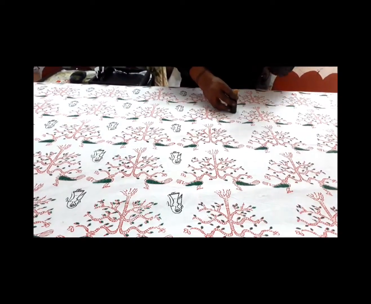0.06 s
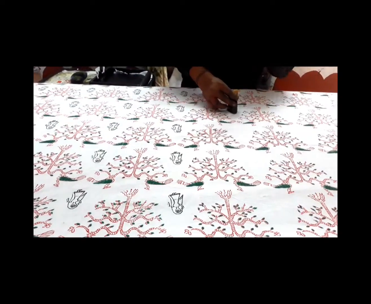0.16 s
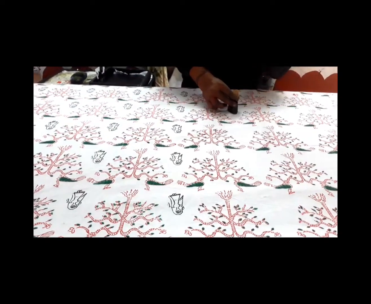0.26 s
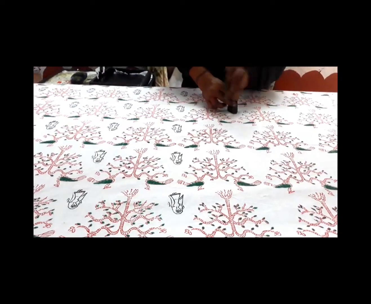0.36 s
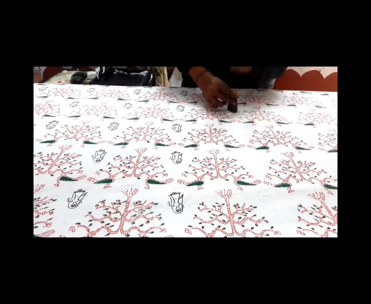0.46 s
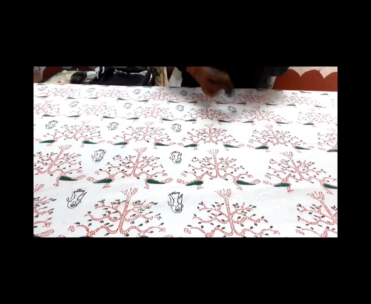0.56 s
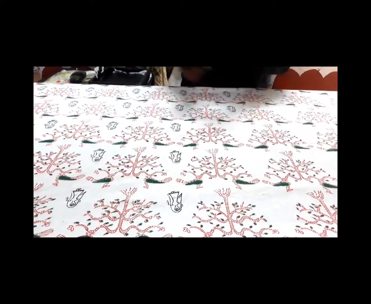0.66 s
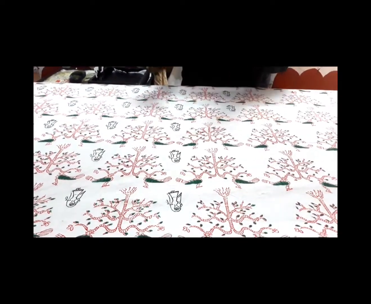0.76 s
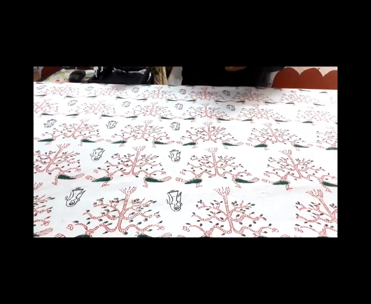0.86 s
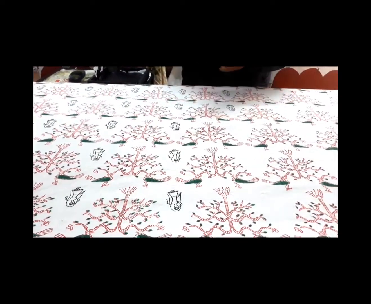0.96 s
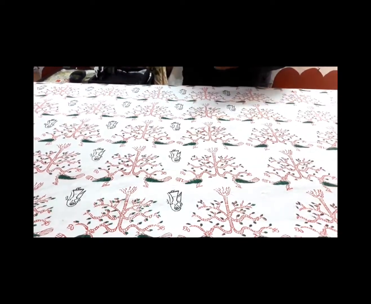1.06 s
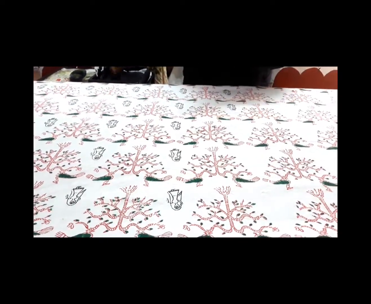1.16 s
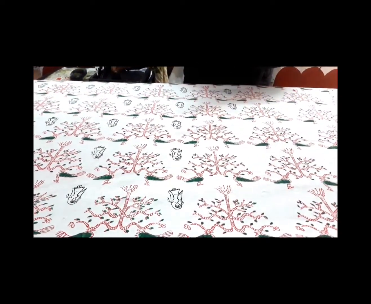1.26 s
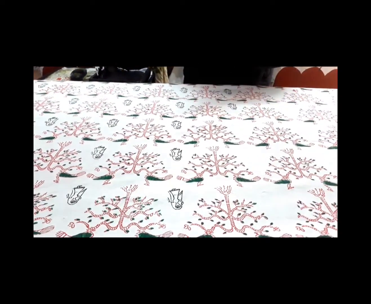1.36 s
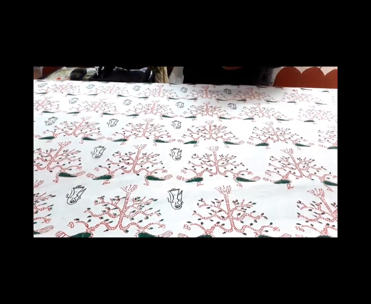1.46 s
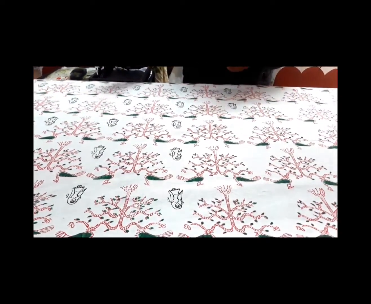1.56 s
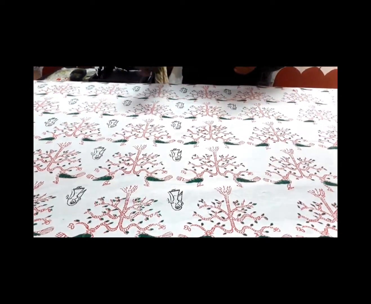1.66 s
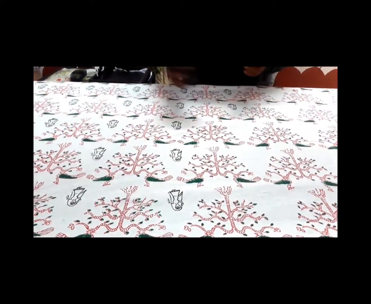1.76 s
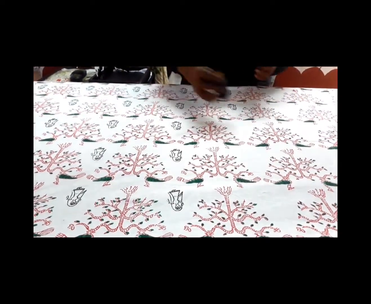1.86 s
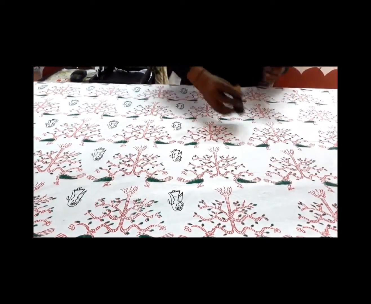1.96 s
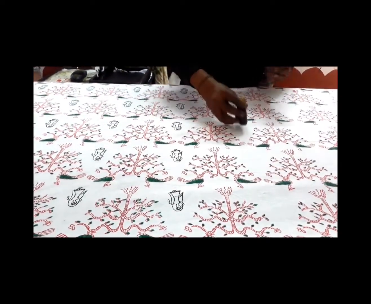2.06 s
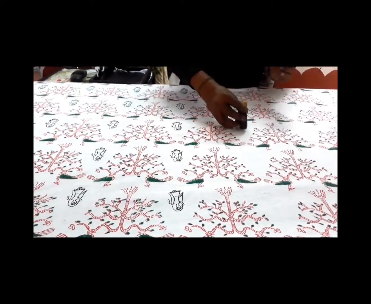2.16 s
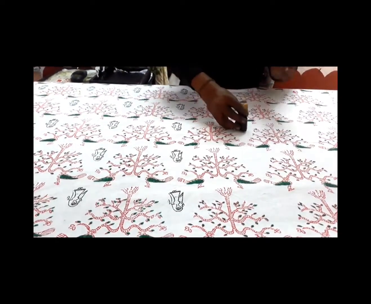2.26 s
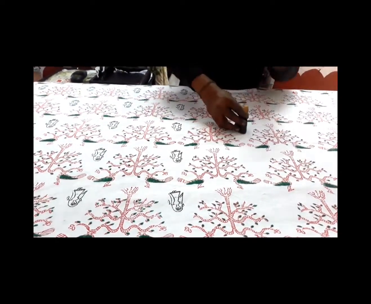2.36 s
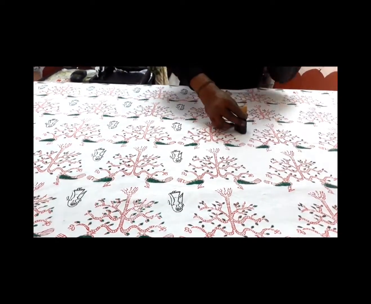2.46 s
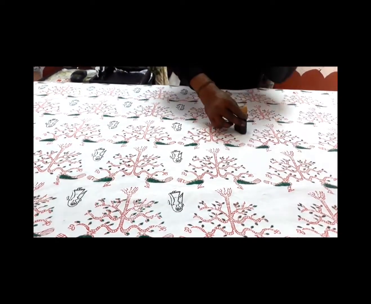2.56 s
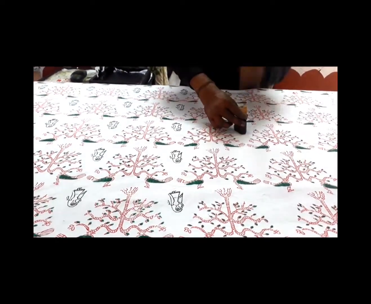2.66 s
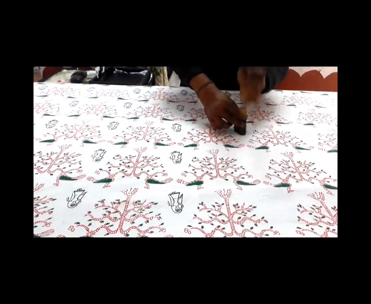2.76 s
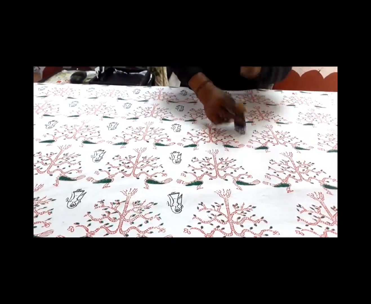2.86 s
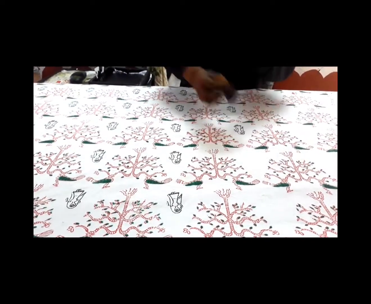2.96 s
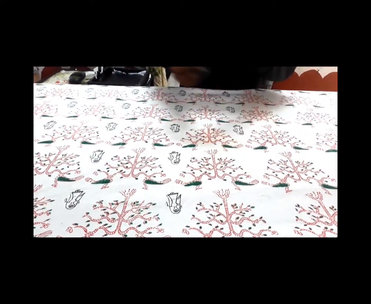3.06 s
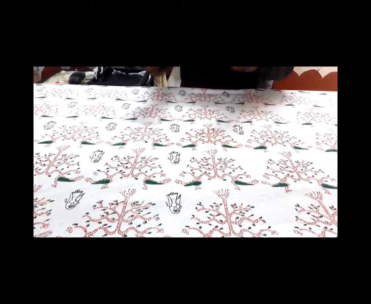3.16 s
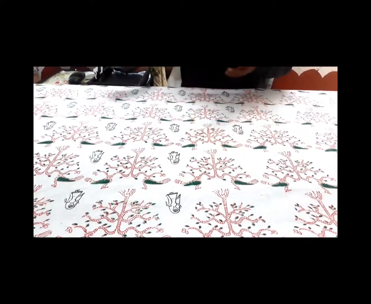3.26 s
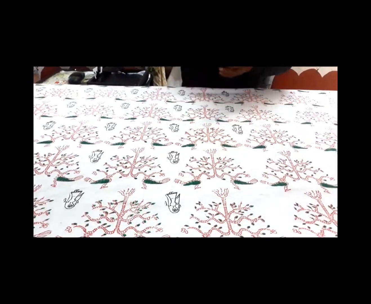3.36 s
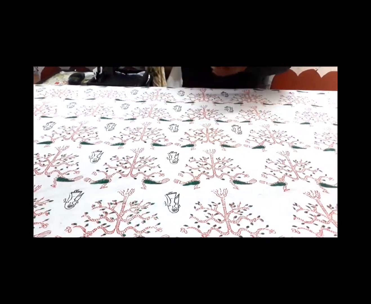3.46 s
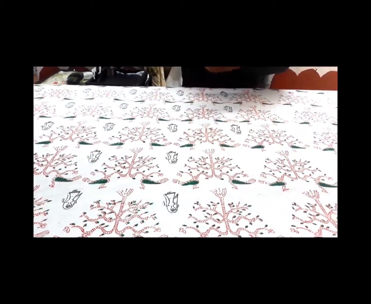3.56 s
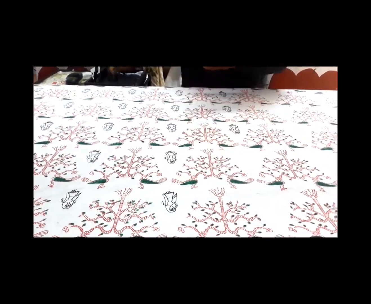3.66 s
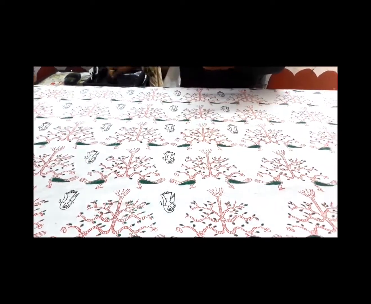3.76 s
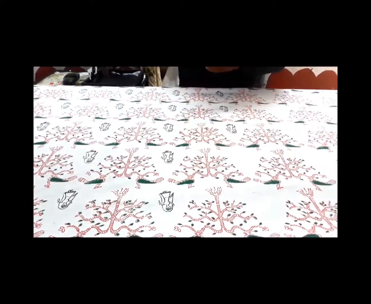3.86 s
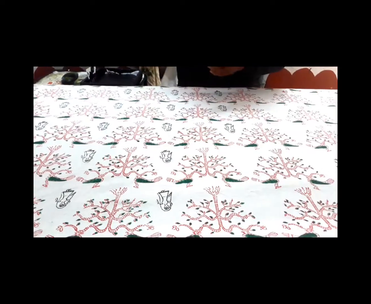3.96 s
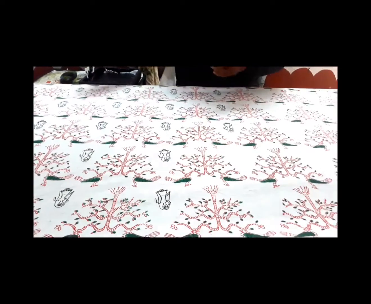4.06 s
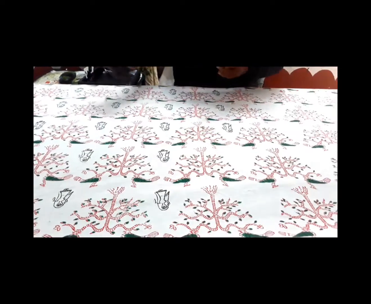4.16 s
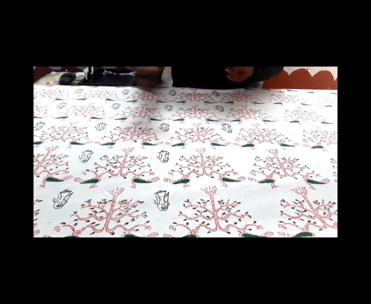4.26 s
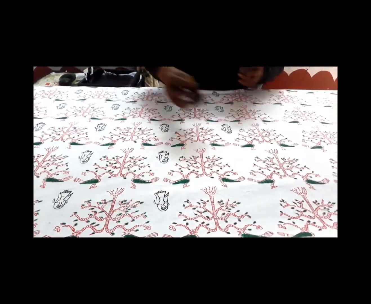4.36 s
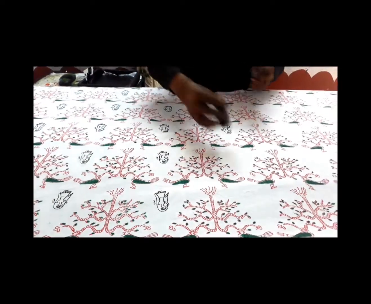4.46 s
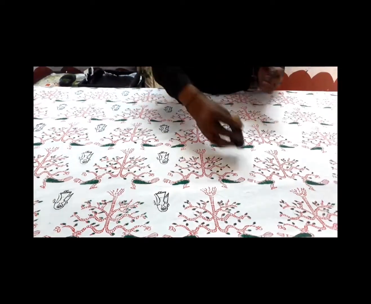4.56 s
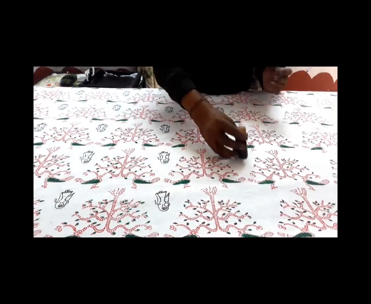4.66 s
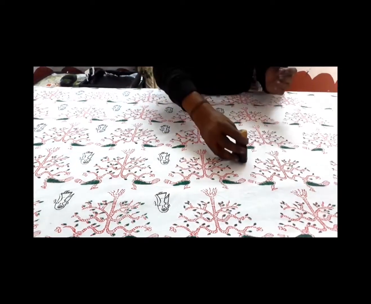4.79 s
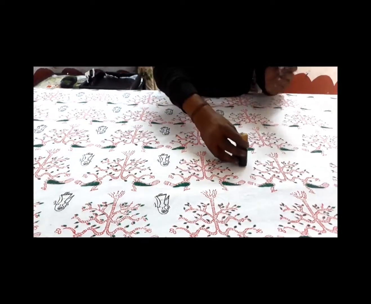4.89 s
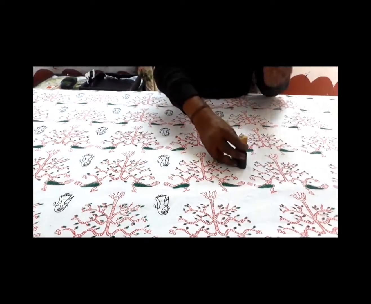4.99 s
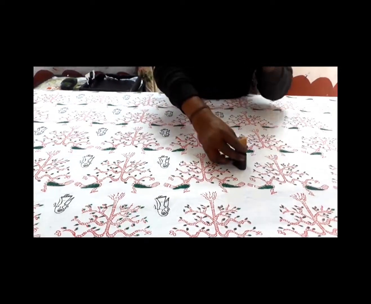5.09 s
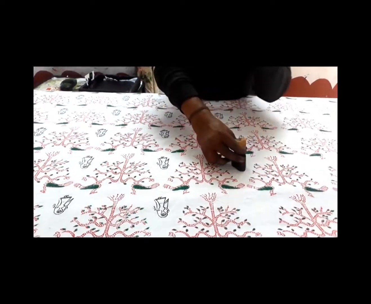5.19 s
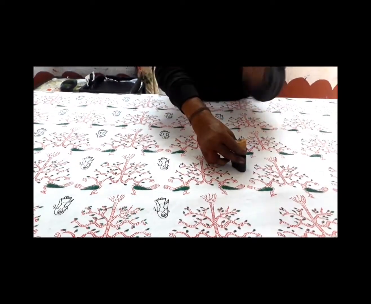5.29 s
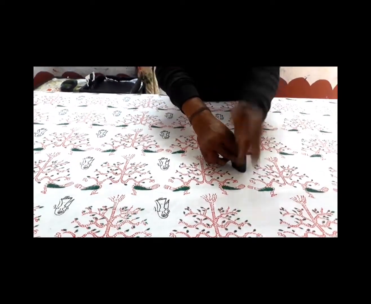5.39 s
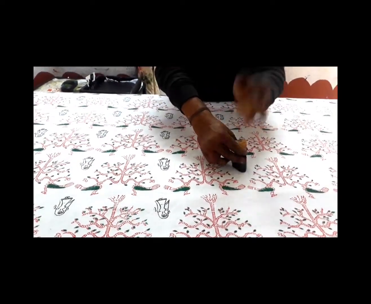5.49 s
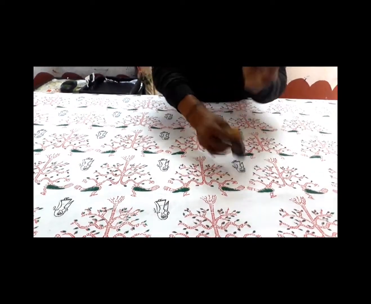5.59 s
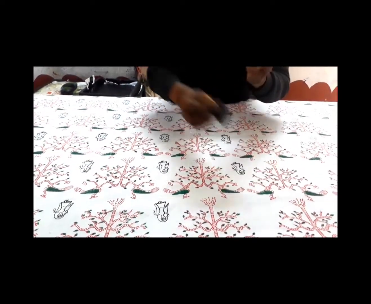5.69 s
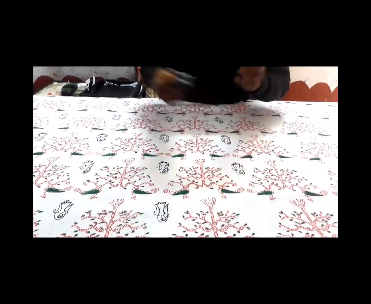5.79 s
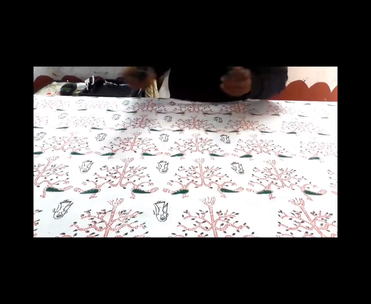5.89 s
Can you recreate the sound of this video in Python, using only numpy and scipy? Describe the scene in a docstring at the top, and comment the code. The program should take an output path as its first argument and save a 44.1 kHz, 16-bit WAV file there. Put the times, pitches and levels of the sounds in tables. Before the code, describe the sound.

Three deep fist thumps on a padded table, with dry wooden block knocks, soft tray rumbles and sleeve swishes between them in a quiet room.

```python
"""Hand block printing

A wooden block is set on cloth with dry knocks (short filtered pulses) in a quiet workshop, then struck
with the fist, so that the padded table booms (ringing modes and low noise). Between prints it is dabbed on
the dye tray, which rumbles. Sleeves swish and cloth shuffles as shaped noise, small things click,
the sliding block hums faintly, and a faint double tick sounds close to the microphone."""
import sys
import numpy as np
from scipy import signal
from scipy.fft import rfft, irfft, next_fast_len
from scipy.io import wavfile
from scipy.ndimage import uniform_filter1d

SR = 44100
rng = np.random.default_rng(int(sys.argv[2]) if len(sys.argv) > 2 else 0)


def materialize(psi):
    """Save the field psi as 16-bit PCM at rate SR to the path in sys.argv[1].

    A 1-D psi becomes a single channel; in a 2-D psi each row is a channel.
    """
    bounded = np.clip(np.atleast_2d(psi).T, -1, 1)
    quanta = np.round(bounded * 32767).astype(np.int16)
    wavfile.write(sys.argv[1], SR, quanta)


N = 261449
TIME = np.arange(N) / SR

# fist on the block: (time [s], level of contacts and boom [dB], contact cut-off [Hz], crack level [dB],
# slap level against the crack [dB], far-end echo level against the contacts [dB])
FIST_BLOWS = [(0.4229, 5.5, 295, -47.5, -36, 15), (2.7718, 5.5, 336, -49, -14, 14.5),
              (5.445, 6.5, 339, -46, -2, 7.5)]
# block dipped in the dye tray: (time [s], level [dB], rubbing length [s])
TRAY_DIPS = [(1.735, -12, 0.08), (4.116, -2, 0.207)]


def from_db(db):
    """Decibels to gain."""
    return 10 ** (np.asarray(db) / 20)


def at_hz(points, hz):
    """Read a spectrum on a log-frequency axis."""
    f, value = np.transpose(points)
    return np.interp(np.log(hz), np.log(f), value)


def cut(x, hz, kind, order=2):
    """Causal Butterworth filter."""
    sos = signal.butter(order, np.clip(hz, 10, .45 * SR), kind, fs=SR, output="sos")
    return signal.sosfilt(sos, x + 1e-18)


def impulses(rows):
    """One single-sample click for each (time [s], level [dB])."""
    out = np.zeros(N)
    for s, db in rows:
        out[round(s * SR)] += from_db(db)
    return out


def decay_per_sample(t60):
    """Factor per sample that falls 60 dB in t60 seconds."""
    return np.exp(-np.log(1000) / (t60 * SR))


def dying(s, t60):
    """Envelope that starts at s and falls 60 dB in t60."""
    return (TIME >= s) * np.exp(-np.log(1000) * np.clip((TIME - s) / t60, 0, 4))


def delayed(x, delay_s):
    """The same signal, later by delay_s."""
    return np.interp(TIME - delay_s, TIME, x)


def ring(force, modes):
    """The force sets every mode swinging; the air follows the speed of the surface, a damped cosine."""
    out = np.zeros(N)
    for hz, db, t60 in modes:
        r = decay_per_sample(t60)
        w = 2 * np.pi * hz / SR
        resonance = [1, -2 * r * np.cos(w), r * r]
        out += from_db(db) * signal.lfilter([.5, 0, -.5], resonance, force + 1e-18)
    return out


def noise(spectrum):
    """Coloured stereo noise of rms 1 whose two sides are partly alike, by frequency."""
    # likeness of left and right: (frequency [Hz], correlation [0 to 1])
    likeness = [(100, .999), (1000, 0.88), (2500, 0.92), (4500, 0.79), (8000, 0.44), (14000, 0.81)]
    size = next_fast_len(N)
    hz = np.maximum(np.fft.rfftfreq(size, 1 / SR), 1)
    alike = np.clip(at_hz(likeness, hz), 0, 1)
    mid, side = rfft(rng.standard_normal((2, size))) * from_db(at_hz(spectrum, hz))
    left_right = np.sqrt(1 + alike) * mid + np.sqrt(1 - alike) * side * [[1], [-1]]
    out = irfft(left_right, size)[:, :N]
    return out / out.std()


def hiss(band_hz, order=2):
    """Noise in one band, rms 1."""
    out = cut(rng.standard_normal(N), band_hz, "band", order=order)
    return out / out.std()


def swell(strokes):
    """Each (time, half length, level) stroke swells and fades like a bell curve."""
    power = 0
    for s, half, db in strokes:
        power = power + from_db(db) ** 2 * np.exp(-np.minimum(((TIME - s) / half) ** 2, 40))
    return np.sqrt(power)


def pad_pressure(attack_s=.02, ease_db_per_s=80, release_s=.03):
    """How hard the block is rubbed on the dye pad: attack, steady easing, release."""
    out = 0
    for s, db, length in TRAY_DIPS:
        since = np.clip(TIME - s, 0, 1)
        attack = np.clip(since / attack_s, 0, 1)
        release = np.clip(1 - (since - length) / release_s, 0, 1)
        out = out + attack * release * from_db(db - ease_db_per_s * since)
    return out


def room_air(level_db=-65):
    """The steady air of the room: coloured noise."""
    # colour of the air: (frequency [Hz], relative density [dB per Hz])
    air = [(25, -14), (50, 1), (210, -4), (340, -3.5), (520, -9.5), (1000, -11), (1600, -14.5), (3000, -11),
           (4000, -20), (6000, -22), (8000, -29.5), (9400, -30.5), (10600, -25), (15500, -27.5)]
    return from_db(level_db) * noise(air)


def double_ticks(first_hz=(2000, 6200), second_db=-24, second_t60=0.012, second_hz=(4000, 13000)):
    """A tiny latch-like sound: a clean tick, then a thinner, brighter chatter."""
    # the clearest ticks, all equally strong: time [s]
    clear_times = [0.6324, 1.269, 1.7923, 2.0253, 2.1107, 2.5447, 2.943, 3.2993, 4.0348, 4.5096, 4.6751,
                   5.026, 5.7525]
    clear_db, weak_db, weak_per_s, gap_s = -33.5, -37.5, 2, .0075
    weak = from_db(weak_db) * (rng.random(N) < weak_per_s / SR)   # these fall at random
    ticks = impulses([(s, clear_db) for s in clear_times]) + weak
    first = cut(ticks, first_hz, "band", order=3)
    second = from_db(second_db) * delayed(ticks, gap_s)
    chatter = signal.lfilter([1], [1, -decay_per_sample(second_t60)], second + 1e-18)
    return first + cut(chatter * rng.standard_normal(N), second_hz, "band")


def rubbing(effort, spectrum, grain_db):
    """Friction noise follows the effort, unevenly as the weave catches."""
    catches = uniform_filter1d(rng.standard_normal(N), size=300)
    return effort * from_db(grain_db * catches / catches.std()) * noise(spectrum)


def cloth(pad_db=-56, sleeve_follows_db=-9.5):
    """Friction of sleeve and cloth; the sleeve also rustles whenever the hands shuffle."""
    # arm swings to the tray and back, twice: (time [s], half length [s], level [dB])
    arm_swings = [(0.88, 0.038, -68.5), (1.675, 0.076, -56.5), (3.25, 0.19, -72), (4.505, 0.042, -61.5)]
    # hands and block shuffling on the cloth: (time [s], half length [s], level [dB])
    hand_shuffles = [(0.92, 0.073, -67.5), (2.655, 0.019, -63.5), (3.668, 0.036, -60.5),
                     (4.04, 0.0092, -61), (4.98, 0.015, -61), (5.88, 0.036, -65)]
    # colours of sleeve and shuffle: (frequency [Hz], relative density [dB per Hz])
    sleeve_colour = [(500, -18), (1000, -18.5), (1600, -5.5), (2300, -2), (3100, -0.5), (4000, -14.5),
                     (6500, -20.5), (9000, -30), (14000, -29)]
    shuffle_colour = [(50, 1.5), (150, -7), (250, -1.5), (400, -8), (800, -13), (1500, -19.5), (3000, -46)]
    shuffling = swell(hand_shuffles) + from_db(pad_db) * pad_pressure()
    swinging = swell(arm_swings) + from_db(sleeve_follows_db) * shuffling
    sleeve = rubbing(swinging, sleeve_colour, grain_db=0.97)
    return sleeve + rubbing(shuffling, shuffle_colour, grain_db=5.0)


def judders(width=1.05):
    """The sliding block sticks and slips at a nearly steady rate: a faint hum of narrow noise."""
    # slides of the block: (time [s], half length [s], level [dB], centre [Hz])
    slides = [(2.353, 0.29, -70.5, 207), (4.1, 0.029, -63, 309), (4.63, 0.029, -67.5, 256)]
    out = 0
    for s, half, db, hz in slides:
        out = out + swell([(s, half, db)]) * hiss([hz / width, hz * width])
    return out


def clicks(width_hz=3000, top_hz=3600, lead_s=0.0061):
    """Light touches, also the first on the dye pad: short broad scuffs, their top dulled by cloth and wood."""
    # touches of wood and fingers: (time [s], level [dB], centre [Hz], t60 [s])
    touches = [(1.267, -58.5, 2000, 0.051), (1.332, -51, 2720, 0.025), (3.570, -54, 315, 0.017),
               (3.634, -52, 527, 0.025), (3.718, -51.5, 440, 0.049), (3.775, -50, 2690, 0.097),
               (3.834, -53, 2550, 0.11), (4.988, -54, 1200, 0.028), (5.2947, -49, 790, 0.05),
               (5.6855, -50, 850, 0.0067)]
    landing_db, landing_hz, landing_t60 = -52.5, 2680, .2   # level against the dip
    landings = [(s - lead_s, db + landing_db, landing_hz, landing_t60) for s, db, length in TRAY_DIPS]
    scuffs = 0
    for s, db, hz, t60 in touches + landings:
        spread = np.sqrt(1 + width_hz / hz)   # higher scuffs are more focused
        scuffs = scuffs + from_db(db) * dying(s, t60) * hiss([hz / spread, hz * spread])
    return cut(scuffs, top_hz, "low", order=6)


def dabs(contact_hz=380, rub_db=-29.5):
    """The block sinks into the soft dye pad in several pushes and is rubbed round; the tray rumbles."""
    # block lands, sinks in and is pushed twice more: (time from the landing [s], level [dB])
    pad_pushes = [(0.0, -4.5), (0.011, -1.5), (0.023, -0.5), (0.064, -12), (0.079, -7)]
    # modes of the dye tray: (frequency [Hz], level [dB], t60 [s])
    tray_modes = [(58, -51, 0.35), (88.1, -46.5, 0.082), (112, -49, 0.2), (129, -45.5, 0.223),
                  (190.8, -41.5, 0.13), (204.4, -48.5, 0.268), (263, -89, 0.099), (330, -63.5, .18),
                  (410, -58.5, 0.11)]
    pushes = impulses([(s + after, db + push_db)
                       for s, db, length in TRAY_DIPS for after, push_db in pad_pushes])
    friction = from_db(rub_db) * pad_pressure() * rng.standard_normal(N)
    force = pushes + cut(friction, 70, "high")
    return ring(cut(force, contact_hz, "low", order=3), tray_modes)


def knocks(snap_hz=(1850, 3150)):
    """Single damped pulses: soft contacts are longer and duller, hard ones snap more, light ones lack bass."""
    # dry knocks of the block: (time [s], level [dB], contact cut-off [Hz])
    dry_knocks = [(1.9086, 19.5, 976), (2.0575, 0, 534), (2.376, -26.5, 1420), (2.5846, 3.5, 670),
                  (4.6105, -22, 1556), (5.2991, -15, 1200), (5.5706, 13, 790), (5.6857, 3, 190)]
    # woody snap against the knock at one contact cut-off, and its growth as the contact hardens
    snap_base_db, snap_contact_hz, snap_db_per_octave = -22, 973, 46
    # firm knocks reach down to deepest_hz; at 0 dB the bass ends shallow_hz higher,
    # a gap that doubles for each step lighter
    deepest_hz, shallow_hz, lighter_step_db = 120.5, 35, 8
    out = 0
    for s, db, contact_hz in dry_knocks:
        hit = impulses([(s, db)])
        lowest_hz = deepest_hz + shallow_hz * 2 ** (-db / lighter_step_db)
        snap_db = snap_base_db + snap_db_per_octave * np.log2(contact_hz / snap_contact_hz)
        out = out + cut(cut(hit, contact_hz, "low", order=4), lowest_hz, "high")
        out = out + from_db(snap_db) * cut(hit, snap_hz, "band", order=3)
    return out


def skin_cracks(lead_s=0.0023, crack_t60=0.04, rattle_db=-12, rattle_t60=0.42, rattle_top_hz=5000):
    """Skin on wood just before the boom: broad crack, duller after-rattle, bright slap of a flat hand."""
    # colour of the crack: (frequency [Hz], relative density [dB per Hz])
    crack_colour = [(400, -3), (900, 8.5), (1500, 0.5), (2900, 6.5), (4200, -6.5), (5300, -7.5),
                    (8000, -19), (14000, -23)]
    # the block's own short ring under a flat slap: (frequency [Hz], level [dB], t60 [s])
    block_modes = [(5030, 7.5, 0.0058), (5500, -1.5, 0.014), (10600, 1.5, 0.0031)]
    crack, rattle, slaps = 0, 0, []
    for s, db, contact_hz, crack_db, slap_db, echo_db in FIST_BLOWS:
        start = s - lead_s
        crack = crack + from_db(crack_db) * dying(start, crack_t60)
        rattle = rattle + from_db(crack_db + rattle_db) * dying(start, rattle_t60)
        slaps.append((start, crack_db + slap_db))
    dull_rattle = cut(rattle * noise(crack_colour), rattle_top_hz, "low")
    return crack * noise(crack_colour) + dull_rattle + ring(impulses(slaps), block_modes)


def fist_blows(push_hz=(250, 560), echo_s=.0365, echo_hz=(340, 500), boom_db=-56, boom_t60=0.69):
    """Once the padding is squeezed the table takes the blow, rings in its modes and booms."""
    # block touches, seats and rocks once: (time from the blow [s], level [dB])
    rocking = [(-0.0028, -18.5), (0.0, -3.5), (0.0087, -10)]
    # modes of the table top: (frequency [Hz], level [dB], t60 [s])
    table_modes = [(38, -54.5, 0.92), (68.4, -53.5, 0.85), (88.1, -55, .6), (112.8, -39.5, 0.13),
                   (155.3, -48, 0.29), (176, -38, 0.17), (200, -50.5, 0.36), (275.3, -36.5, 0.15),
                   (324.6, -45.5, 0.24), (370.7, -38, 0.24), (394.3, -32.5, 0.23), (450, -32, 0.12),
                   (513, -21, 0.13), (557, -38, 0.28), (561, -46, 0.11), (622, -16, 0.097),
                   (842, -19, 0.066), (1050, -36, 0.16)]
    # colour of the boom: (frequency [Hz], relative density [dB per Hz])
    boom_colour = [(40, 45.5), (90, 10), (200, 1), (380, -24), (600, -17), (900, -71), (2000, -3.5)]
    force, returned, boom = 0, 0, 0
    for s, db, contact_hz, crack_db, slap_db, echo_db in FIST_BLOWS:
        contacts = impulses([(s + after, db + rock_db) for after, rock_db in rocking])
        blow = cut(contacts, contact_hz, "low", order=4)
        force = force + blow
        # the bending wave comes back from the table's far end
        returned = returned + from_db(echo_db) * delayed(blow, echo_s)
        boom = boom + from_db(db + boom_db) * dying(s, boom_t60)
    push = cut(force, push_hz, "band")   # the top gives way once before it rings
    echo = cut(returned, echo_hz, "band")
    return ring(force, table_modes) + push + echo + boom * noise(boom_colour)


def scene():
    """The work at the table over the steady air of the room."""
    background = room_air() + double_ticks() + cloth()
    handling = judders() + clicks() + dabs()
    printing = knocks() + skin_cracks() + fist_blows()
    return background + handling + printing


def record(dry):
    """The microphone loses the deepest bass; the top is cut steeply."""
    thin = cut(dry, 45, "high", order=3)
    top_cut = signal.ellip(12, .1, 70, 15800, fs=SR, output="sos")   # cut-off in Hz
    return signal.sosfilt(top_cut, thin)


dry = scene()
out = record(dry)
materialize(out)
```